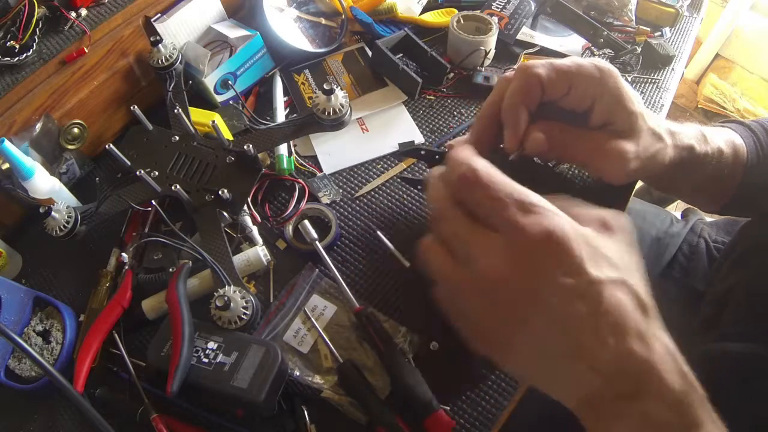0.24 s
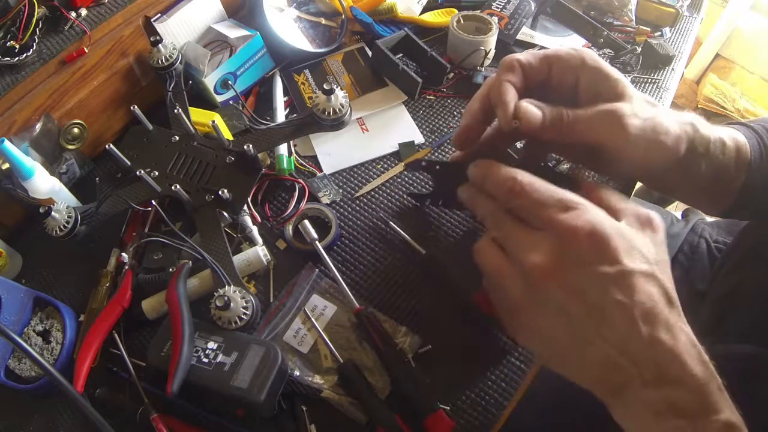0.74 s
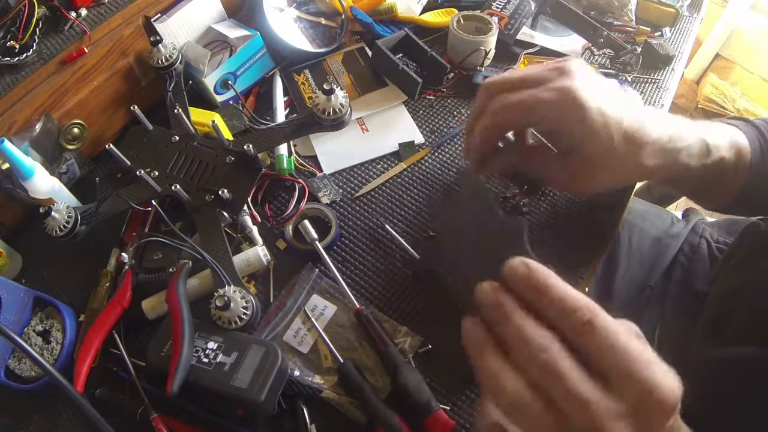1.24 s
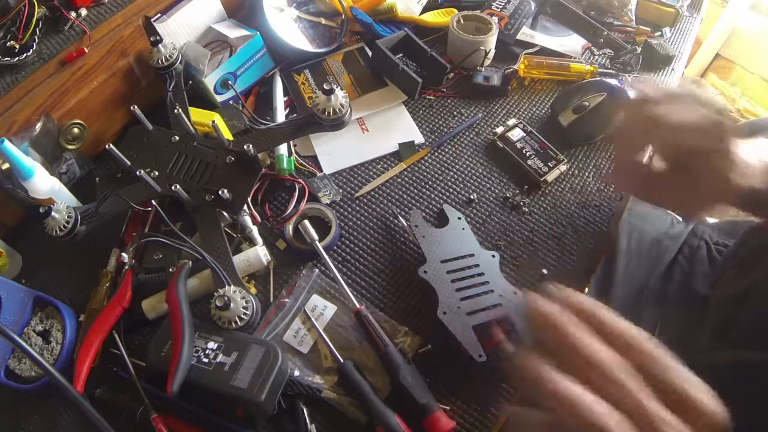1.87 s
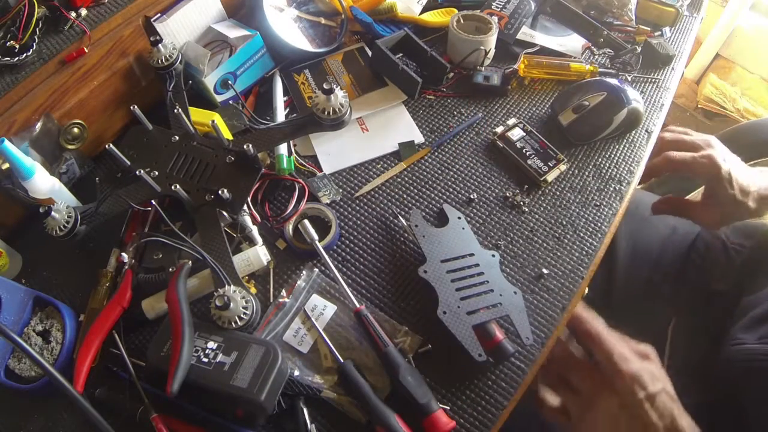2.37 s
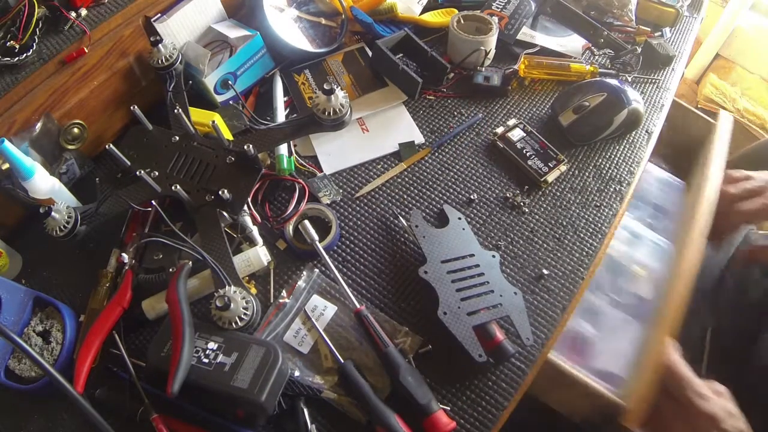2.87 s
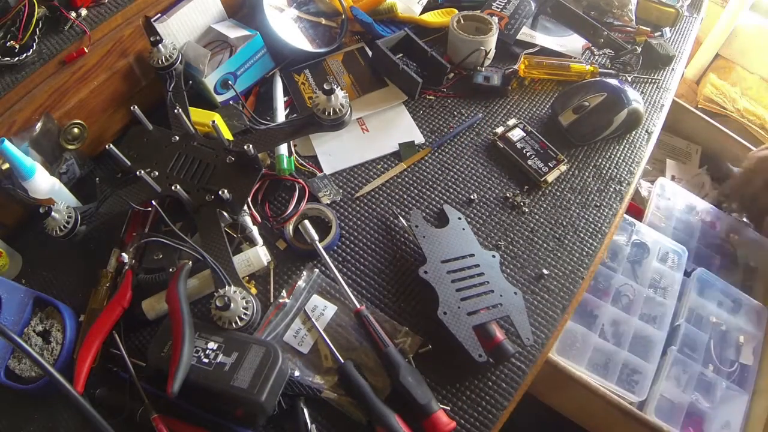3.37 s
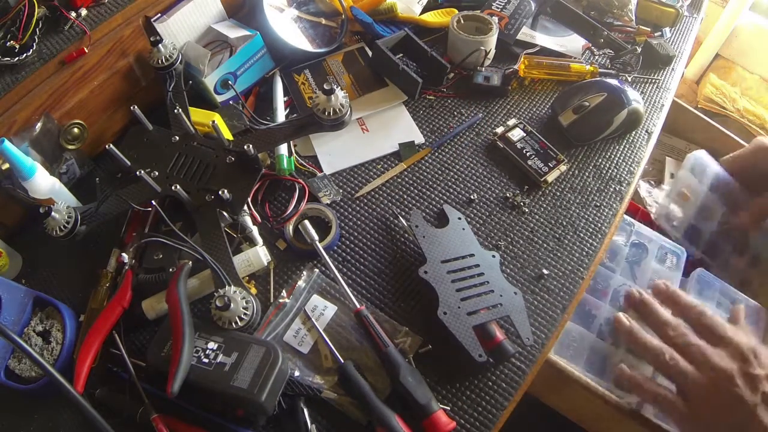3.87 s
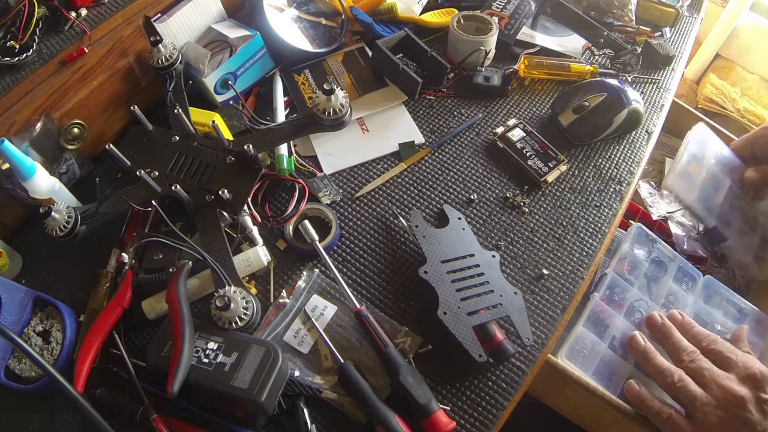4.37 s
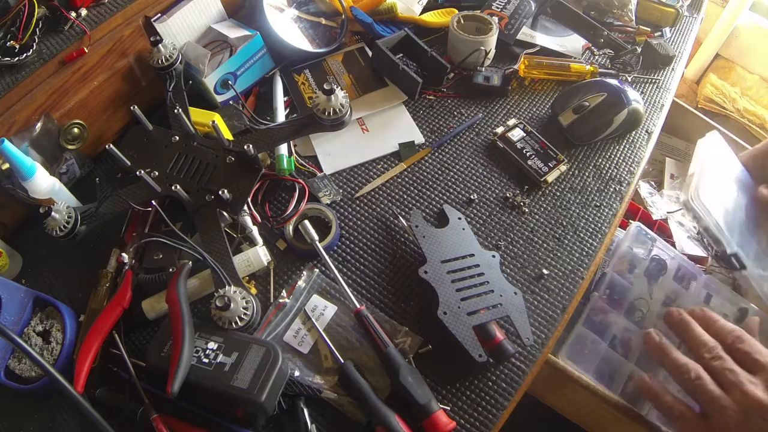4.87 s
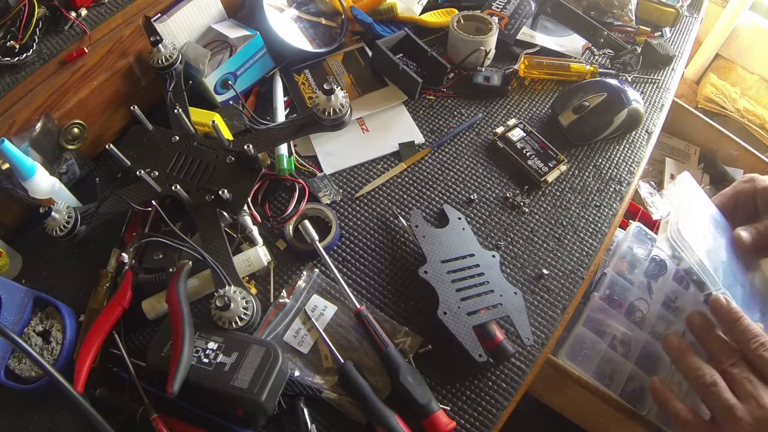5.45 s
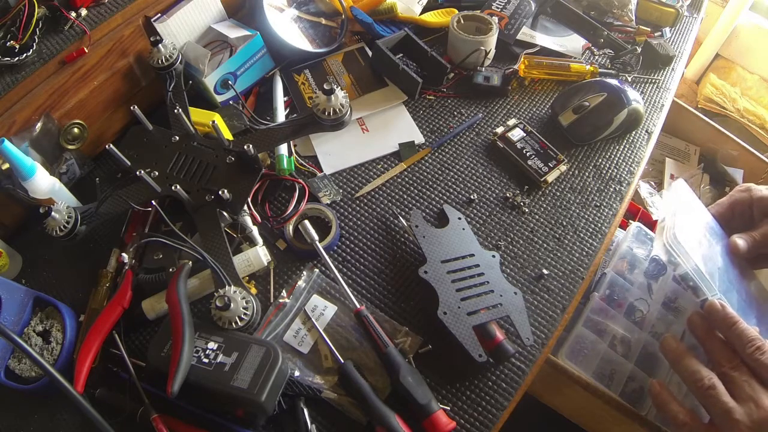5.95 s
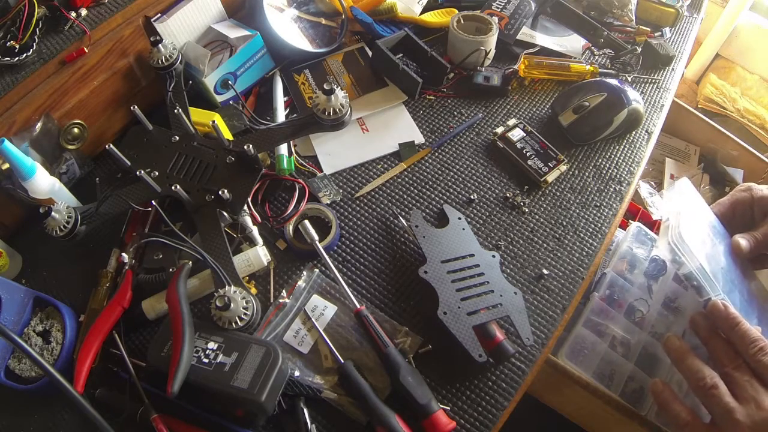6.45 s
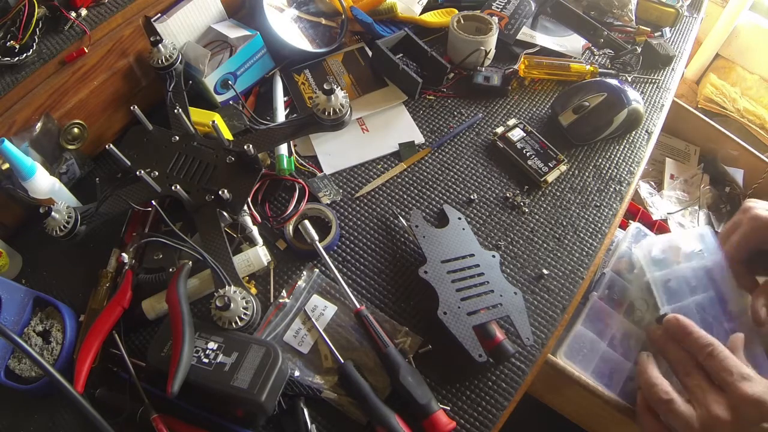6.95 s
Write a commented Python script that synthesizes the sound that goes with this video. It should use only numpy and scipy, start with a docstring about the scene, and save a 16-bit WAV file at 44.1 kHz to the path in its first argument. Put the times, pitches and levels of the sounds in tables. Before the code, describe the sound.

Over a low room rumble and a barely audible fluttering high whine, a thin plate is handled and set down sharply on a bench. A drawer grinds open with hollow wooden thumps and a ringing runner. Screw-filled plastic boxes are shifted with knocks and bright rattles, gently searched after a lull, and finally dropped with a hard clack. Close microphone, short indoor echo.

```python
"""In a workshop with a low rumble, a thin plate is tapped down on a bench, a wooden drawer slides open
in jerks, and plastic boxes full of screws are lifted, tipped and put back. A faint whine pulses throughout.
Plate and boxes ring as fading sine waves, while scraping, rattling and room air are noise shaped in pitch
and loudness. Random reflections add the room."""
import sys
import numpy as np
from scipy import signal
from scipy.fft import rfft, irfft
from scipy.io import wavfile
from scipy.ndimage import uniform_filter1d

SR = 44100
rng = np.random.default_rng(int(sys.argv[2]) if len(sys.argv) > 2 else 0)


def store_wav(level_fs):
    """Save 16-bit WAV to argv[1]."""
    pcm = np.round(np.clip(np.atleast_2d(level_fs), -1, 1) * 32767)
    wavfile.write(sys.argv[1], SR, pcm.T.astype(np.int16))


N = 317520

# Bright spectrum of small hard metal parts: pitch_hz [Hz], level_db [relative dB per Hz]
METAL_SPECTRUM = [(530, -28), (900, -18.5), (1190, -7.5), (2010, -9.5), (3050, -2), (4740, -1), (5360, 2),
                  (6750, -2), (7870, -9.5), (11200, -15.5), (12500, -34), (16200, -69), (22000, -120)]
# Dull spectrum of the plastic box walls: pitch_hz [Hz], level_db [relative dB per Hz]
WALL_SPECTRUM = [(88, -51), (150, -9), (183, 1), (237, -9), (385, 1.5), (516, -5), (780, -2.5),
                 (2500, -7.5), (3250, -38.5), (5500, -120)]


def amp(db):
    """Turns decibels into a plain factor."""
    return 10 ** (np.asarray(db) / 20)


def evened(x):
    """Scales a sound to an average (rms) level of 1."""
    return x / np.sqrt(np.mean(x ** 2) + 1e-20)


def add(mix, s, sound):
    """Adds a sound into the mix from second s on, cut at the end of the mix."""
    part = mix[round(s * SR):][:len(sound)]
    part += sound[:len(part)]


def coloured(x, points):
    """Shapes x by a spectrum and evens it to rms 1."""
    hz, db = np.transpose(points)
    f = np.fft.rfftfreq(len(x), 1 / SR)
    curve_db = np.interp(np.log(f + 1), np.log(hz + 1), db)
    return evened(irfft(rfft(x) * amp(curve_db), len(x)))


def tilted(x, tilt_db):
    """Leans the spectrum about 4 kHz by so many dB per octave, flat below 1 kHz."""
    hz = np.fft.rfftfreq(len(x), 1 / SR)
    octaves = np.log2(np.clip(hz, 1000, None) / 4000)
    return irfft(rfft(x) * amp(tilt_db * octaves), len(x))


def whistles(x, modes):
    """Sum of narrow resonances fed by x, each given as (pitch Hz, width Hz, level dB)."""
    return sum(amp(db) * evened(signal.lfilter(*signal.iirpeak(hz, hz / width, SR), x))
               for hz, width, db in modes)


def stroke(t, start, length, rise, sag_db, t60):
    """Gain of one movement: swell, sagging hold, then a release of 60 dB in t60 seconds."""
    u = t - start
    swell = np.clip(u / max(rise, .001), 0, 1) ** 2
    sag = sag_db * np.clip((u - rise) / length, 0, 1)
    release = 60 * np.maximum(u - length, 0) / t60
    return swell * amp(sag - release)


def grains(count, spread_db, low_hz, high_hz, cycles):
    """Random collisions of uneven size, each a few dying cycles at one of 24 pitches."""
    collisions_per_s = 2500
    size = amp(spread_db * np.minimum(rng.exponential(1, count), 4))
    size = size * (rng.random(count) < collisions_per_s / SR)
    which, out = rng.integers(0, 24, count), np.zeros(count)
    for k, hz in enumerate(np.geomspace(low_hz, high_hz, num=24)):
        turns = np.arange(400) * hz / SR
        grain = np.sqrt(hz) * np.sin(2 * np.pi * turns) * np.exp(-turns / cycles)
        out += signal.oaconvolve(size * (which == k), grain)[:count]
    return out


def room_air():
    """Steady noise whose two lowest bands swell on their own, with faint fan whistles."""
    # Spectrum of the air: pitch_hz [Hz], level_db [relative dB per Hz]
    air_spectrum = [(7.1, -35), (12, 7.5), (32, 5.5), (54, -15.5), (97, -11), (113, -15.5), (138, -28.5),
                    (174, -24.5), (371, -36), (1120, -42), (4930, -52.5), (5700, -51), (6590, -57),
                    (11100, -63), (12500, -83.5), (16200, -113), (22000, -120)]
    # Swell of the rumble: time_s [s], throb_db [dB], drone_db [dB]
    rumble_swell = [(0.0, -28.5, -45), (0.26, -48.5, -44), (0.62, -40.5, -44.5), (2.17, -40.5, -45),
                    (3.31, -38, -38.5), (3.35, -41, -47), (3.43, -35.5, -44), (4.33, -42, -42.5),
                    (4.47, -38, -47), (5.29, -38.5, -42), (5.39, -43, -41.5), (6.62, -39.5, -42),
                    (6.76, -57, -45.5), (6.86, -38.5, -45.5), (7.0, -47, -48), (7.02, -35.5, -38),
                    (7.14, -34, -44), (7.2, -38, -48)]
    # Near-tone in the deepest rumble: pitch_hz [Hz], width_hz [Hz], level_db [relative dB]
    throb_tone = [(27.63, 2.56, -3)]
    # Fan whistles: pitch_hz [Hz], width_hz [Hz], level_db [dB]
    fan_whistles = [(716, 13, -77), (1057, 17, -76.5)]
    air_db, waver_db = -37.5, 1
    air = amp(air_db) * coloured(rng.standard_normal(N), air_spectrum)
    deep = signal.sosfiltfilt(signal.butter(3, 50, fs=SR, output="sos"), air)
    low = signal.sosfiltfilt(signal.butter(3, 140, fs=SR, output="sos"), air)
    s, throb_db, drone_db = np.transpose(rumble_swell)
    t = np.arange(N) / SR
    # the drone also wavers at random
    waver = amp(waver_db * evened(uniform_filter1d(rng.standard_normal(N), size=6000)))
    throb = evened(0.91 * evened(deep) + whistles(rng.standard_normal(N), throb_tone))
    throb = throb * amp(np.interp(t, s, throb_db))
    drone = evened(low - deep) * amp(np.interp(t, s, drone_db)) * waver
    # the swelling bands replace the steady lows
    return air - low + throb + drone + whistles(rng.standard_normal(N), fan_whistles)


def whine():
    """Fuzzy high tones, made of narrow noise, that switch on and off about 30 times a second."""
    # Tones before the switching: pitch_hz [Hz], width_hz [Hz], level_db [dB]
    whine_tones = [(5740, 83, -76), (11290, 51, -87.5)]
    pulses_per_s, pulse_middle_s = 29.975, .0234
    turn = np.cos(2 * np.pi * pulses_per_s * (np.arange(N) / SR - pulse_middle_s))
    gate = np.clip(2.5 * (turn - .1), 0, 1)
    return whistles(rng.standard_normal(N), whine_tones) * gate


def plate():
    """Each tap is a thin crack and the plate's modes; the spot struck favours or softens some of them."""
    # Taps: start_s [s], peak_db [dB], tilt_db [dB per octave], spot_hz [Hz, pitch affected by the spot],
    # lift_db [dB, its lift], ring [factor on t60], rub_s [s]
    taps = [(.019, -40, -5, 4850, 8, 0.27, 0.0027), (0.0801, -27.5, -6, 4870, 33, 0.34, 0),
            (.1098, -26.5, -5.5, 4870, 49, 0.25, 0.0013), (.44, -58.5, 8, 8060, 8, 2.2, 0.04),
            (.68, -60.5, 4, 8000, 10, 1.1, 0.041), (0.732, -51.5, 4, 9100, 14, 0.56, 0),
            (0.86, -49.5, -2, 6578, 15, 0.92, 0.0039), (1.4780, -10, 5.5, 5250, -1.5, 0.54, 0),
            (1.4885, -22.5, 4, 3860, -4, 0.5, 0.00051), (1.6724, -27, 3, 8050, 6, 1.13, 0.0016),
            (1.7208, -45, 1, 3250, 29, 0.58, 0.0043), (2.1426, -45.5, 1.5, 2670, 38, 3.3, 0.0057)]
    # Modes of the plate: pitch_hz [Hz], level_db [relative dB], t60_s [s to fade by 60 dB]
    plate_modes = [(806, -10.5, 0.12), (1640, -74.5, 0.021), (2135, -7.5, 0.15), (2240, -7.5, 0.087),
                   (2670, -23.5, 0.055), (3250, -8, 0.1036), (3776, -5.5, 0.093), (3860, -10, 0.16),
                   (3980, -0.5, 0.058), (4600, -11, 0.072), (4870, -16.5, 0.0882), (5300, -21.5, 0.076),
                   (5254, 6.5, 0.038), (5800, -7.5, 0.056), (6190, -27, 0.087), (6578, -12, 0.12),
                   (7580, -10.5, 0.08), (8130, -4, 0.022), (8310, -15, 0.0816), (9100, -11.5, 0.074),
                   (9520, -9.5, 0.11), (11075, -8.5, 0.046), (12080, -22.5, 0.042)]
    out, t = np.zeros(N), np.arange(9000) / SR
    hz, db, t60 = np.transpose(plate_modes)[:, :, None]
    for s, peak_db, tilt_db, spot_hz, lift_db, ring, rub in taps:
        lift = lift_db * np.exp(-(np.log2(hz / spot_hz) / 0.056) ** 2)
        spot_db = lift + tilt_db * np.log2(hz / 4000)
        # the loose plate chatters on the bench, so each mode wavers
        wobble = uniform_filter1d(rng.standard_normal((len(hz), len(t))), size=100)
        waver = 1 + .45 * evened(wobble)
        modes = amp(db + spot_db - 60 * t / (t60 * ring)) * np.sin(2 * np.pi * hz * t) * waver
        # neighbours start in opposite directions: no low thud
        tone = modes[::2].sum(0) - modes[1::2].sum(0)
        crack = 0.19 * coloured(rng.standard_normal(len(t)), METAL_SPECTRUM) * amp(-60 * t / 0.0098)
        # a rub is many tiny taps in a row; without one, a single tap
        contact = rng.standard_normal(len(t)) * (t <= rub)
        sound = signal.fftconvolve(tone / abs(tone).max() + crack, contact)
        add(out, s, amp(peak_db) * sound / abs(sound).max())
    return out


def rattles():
    """Bright rattle with the plate taps, then screws colliding and sliding in the boxes, over duller grains."""
    # Bursts of rattle: start_s [s], swell_s [s], length_s [s], rattle_db [dB gain],
    # walls_db [dB gain, dull grains as of plastic walls], hollow_hz [Hz, pitch that stands out]
    bursts = [(.052, .01, 0.024, -59, -77, 6000), (0.076, .003, 0.015, -53, -75, 3000),
              (0.108, .004, 0.0076, -43, -72, 4600), (1.474, 0.0018, 0.027, -46, -72, 9300),
              (1.525, 0.033, 0.13, -59.5, -81, 5630), (1.673, .002, 0.027, -53, -72, 3300),
              (3.392, .1, 0.2, -51.5, -53, 2730), (3.552, 0.012, 0.66, -47.5, -47.5, 2500),
              (3.886, 0.015, 0.04, -40, -51, 3200), (3.934, 0.021, 0.12, -45.5, -49.5, 5000),
              (4.025, 0.014, 0.028, -39, -67, 3350), (4.101, 0.01, 0.019, -41.5, -72, 3000),
              (4.162, 0.044, 0.061, -48, -72, 3400), (4.972, 0.016, 0.043, -63.5, -83, 5300),
              (5.073, .01, 0.079, -64, -75, 4700), (5.125, 0.063, 0.2, -52, -71, 3400),
              (5.304, .06, 0.16, -54, -79, 3620), (5.413, 0.018, 0.064, -51.5, -56.5, 3540),
              (5.67, .01, 0.034, -48.5, -55.5, 2250), (5.71, 0.049, 0.14, -58.5, -64, 2500),
              (5.85, 0.035, 0.04, -47.5, -57, 2450), (5.94, 0.036, 0.051, -59, -63, 2680),
              (6.709, 0.018, 0.097, -42.5, -48.5, 5800), (6.84, 0.018, 0.11, -60, -55.5, 3070),
              (6.942, 0.063, 0.09, -39, -45.5, 3000), (7.002, 0.0052, 0.028, -23.5, -23.5, 5300),
              (7.036, 0.039, 0.056, -31, -42, 5700)]
    sliding = 0.42  # share of the power that is smooth noise
    base_tilt_db, tilt_per_db = -0.5, -0.0824  # dB per octave at -50 dB; louder bursts are duller
    sag_db, burst_t60_s = -6, 0.14
    hollow_q, hollow_db = 5.4, -10  # sharpness, level
    out = np.zeros(N)
    hits = coloured(grains(N, 4.5, 1200, 11500, 1.5), METAL_SPECTRUM)
    slide = coloured(rng.standard_normal(N), METAL_SPECTRUM)
    metal = np.sqrt(1 - sliding) * hits + np.sqrt(sliding) * slide
    wall_size = amp(3.0 * np.minimum(rng.exponential(1, N), 3))
    walls = coloured(rng.standard_normal(N) * wall_size, WALL_SPECTRUM)
    for s, swell, length, rattle_db, walls_db, hollow_hz in bursts:
        at = np.arange(round(s * SR), min(round((s + length + burst_t60_s) * SR), N))
        rattle = tilted(metal[at], base_tilt_db + tilt_per_db * (rattle_db + 50))
        rattle = rattle + whistles(rattle, [(hollow_hz, hollow_hz / hollow_q, hollow_db)])
        gain = stroke(at / SR, s, length, swell, sag_db, burst_t60_s)
        add(out, s, gain * (amp(rattle_db) * rattle + amp(walls_db) * walls[at]))
    return out


def knocks():
    """Hollow knocks with the plate taps, then of drawer and boxes: low modes at each pitch, and a shudder."""
    # Blows: start_s [s], level_db [dB gain], pitch_hz [Hz], t60_s [s, before the mode's factor],
    # hardness_db [dB more for each higher mode]
    blows = [(0.107, -28, 222, 0.048, -10), (1.72, -40, 223, 0.079, -10), (2.144, -34.5, 302, 0.049, -4),
             (2.345, -40.5, 490, 0.024, -7), (2.399, -19, 442, 0.021, -14), (2.577, -24.5, 393, 0.024, 8.5),
             (2.669, -32, 224, 0.14, 3.5), (2.858, -23, 242, 0.028, 9.5), (3.565, -28.5, 436, 0.059, 6.5),
             (3.754, -41, 406, 0.039, 0), (3.804, -41, 420, 0.066, 12), (3.862, -23.5, 477, 0.016, 9.5),
             (3.893, -9, 523, 0.027, -11), (3.979, -31, 563, 0.025, 11), (4.011, -25.5, 630, 0.047, -6.5),
             (4.037, -13, 360, 0.021, 12), (4.072, -33, 646, 0.034, 4), (4.109, -26.5, 329, 0.048, 10),
             (5.14, -44, 209, 0.034, 12), (5.77, -44, 970, 0.015, 0), (6.711, -20.5, 365, 0.038, 10),
             (6.749, -20.5, 330, 0.06, 5), (6.832, -34, 213, 0.028, -6), (6.895, -37, 326, 0.053, 11),
             (7.007, -17, 376, 0.025, 13)]
    # Modes of a hollow box: multiple [of the pitch], level_db [relative dB], ring [factor on t60]
    box_modes = [(1, 0.5, 0.75), (2.2, -13.5, 0.8), (3.7, -23.5, 0.41), (4.6, -35, 0.23)]
    # the shudder changes less than the blow: dB at a 0 dB blow, dB per dB
    shudder_base_db, shudder_growth = -26, 0.63
    out, t = np.zeros(N), np.arange(9000) / SR
    for s, level_db, hz, t60, hard_db in blows:
        modes = np.zeros(len(t))
        for i, (multiple, db, ring) in enumerate(box_modes):
            fade = amp(level_db + db + i * hard_db - 60 * t / (t60 * ring))
            modes += fade * np.sin(2 * np.pi * multiple * hz * t)
        shudder_db = shudder_base_db + shudder_growth * level_db
        shudder = coloured(rng.standard_normal(len(t)), WALL_SPECTRUM) * amp(shudder_db - 60 * t / 0.089)
        add(out, s, (modes + shudder) * np.minimum(t / 0.0016, 1))
    return out


def drawer():
    """Dense uneven slips scrape the runner, ring it, make it groan and shake the wooden case."""
    # Jerks: start_s [s], length_s [s], then gains [dB]: scrape_db, boom_db (wood), ring_db (runner), groan_db
    jerks = [(2.309, 0.1, -61.5, -56.5, -77, -73), (2.389, 0.042, -41, -42.5, -45, -60),
             (2.467, 0.064, -58.5, -55, -56, -64), (2.566, 0.069, -52.5, -41.5, -45, -52),
             (2.664, 0.043, -53, -41, -62, -59), (2.706, 0.11, -44.5, -46, -40, -63),
             (2.845, 0.04, -44.5, -43.5, -38, -60), (2.901, 0.089, -53, -50, -63, -51),
             (3.002, 0.16, -42, -41, -38, -51), (3.17, .16, -41, -41.5, -37.5, -66)]
    # Power on the jerk's shape for scrape, boom, ring, groan [no unit]: the ring drops faster
    fall_off = [1, 1, 1.7, 1]
    # Spectra of scrape and wooden boom: pitch_hz [Hz], level_db [relative dB per Hz]
    scrape_spectrum = [(400, -15), (700, -3.5), (1070, -11), (1500, -1), (2900, -6), (5700, -8),
                       (8000, -14), (11400, -26.5), (12500, -56)]
    boom_spectrum = [(53, -35), (90, -20), (134, -2.5), (292, -7), (532, -11.5), (690, -18.5), (1070, -18),
                     (1500, -29), (1950, -26), (3300, -120)]
    # Resonances of runner and wooden case: pitch_hz [Hz], width_hz [Hz], level_db [relative dB]
    runner_modes = [(2480, 92, -7), (5450, 560, -16.5), (3570, 99, -39)]
    case_modes = [(142.6, 8.9, -6.5), (264, 27, -12.5), (744, 130, -13.5)]
    rise_s, sag_db, jerk_t60_s = 0.013, -3.5, 0.24  # times and sag before the power
    groan_start_hz, groan_hz_per_s, groan_top_hz = 598, 1550, 1480
    s, n = jerks[0][0], round(1.3 * SR)
    t = s + np.arange(n) / SR
    gains = np.zeros((4, n))
    for start, length, *db in jerks:
        shape = stroke(t, start, length, rise_s, sag_db, jerk_t60_s)
        gains += amp(db)[:, None] * shape ** np.c_[fall_off]
    scrape_gain, boom_gain, ring_gain, groan_gain = gains
    # rollers pass rough spots
    bumps = amp(1.55 * evened(uniform_filter1d(rng.standard_normal(n), size=300)))
    slips = rng.standard_normal(n) * amp(3.5 * np.minimum(rng.exponential(1, n), 4)) * bumps
    scrape = coloured(slips, scrape_spectrum)
    ring = whistles(slips, runner_modes)
    # the slips run backwards here, so boom and scrape do not move in step
    boom = coloured(slips[::-1], boom_spectrum) + whistles(slips[::-1], case_modes)
    # slow noise on a climbing tone: the resonance of the free length of the runner
    groan_hz = np.minimum(groan_start_hz + groan_hz_per_s * (t - s), groan_top_hz)
    groan = evened(uniform_filter1d(slips, size=150)) * np.sin(2 * np.pi * np.cumsum(groan_hz) / SR)
    out = np.zeros(N)
    add(out, s, scrape_gain * scrape + ring_gain * ring + boom_gain * boom + groan_gain * groan)
    return out


def clicks():
    """The drawer runner, screws and lids click: a wide crack, a short fuzzy ring, then a spill that settles."""
    # Clicks: start_s [s], level_db [dB gain], ring_hz [Hz], spill_db [dB, fading rattle within the click]
    sharp_clicks = [(2.3486, -38.5, 4470, -20), (2.4074, -24, 2240, -26), (2.475, -41, 2500, -4.5),
                    (2.5824, -28.5, 2360, -14.5), (2.72, -31, 2200, -7.5), (2.861, -22.5, 2380, -13.5),
                    (3.0062, -37, 2360, -23), (3.056, -26, 2480, -15.5), (3.1837, -44, 2470, -20),
                    (3.266, -23, 3550, -13), (3.293, -27, 4500, -14), (3.467, -38, 2770, -10.5),
                    (3.5628, -29, 5740, -19), (3.6492, -33.5, 6240, -11), (3.7, -32, 7800, -21),
                    (3.733, -37, 2720, -11), (3.7557, -30, 2290, -14), (3.8065, -23, 2930, -20),
                    (3.8449, -25, 5900, -14.5), (3.909, -24.5, 3430, -14), (3.9783, -28, 5000, -25),
                    (4.038, -29.5, 2240, -17), (4.047, -22, 3470, -32), (4.11, -46, 5150, -19),
                    (4.2025, -38, 3510, -18), (4.325, -54, 4500, -13), (4.565, -60, 2250, -4.5),
                    (4.7162, -41, 2500, -12.5), (4.977, -42, 5300, -26), (5.064, -46, 4630, -20),
                    (5.084, -34, 4730, -15.5), (5.151, -31, 5770, -14), (5.1677, -30, 6000, -31),
                    (5.1871, -31, 4380, -18), (5.212, -35, 4290, -25), (5.2222, -30, 5300, -18),
                    (5.24, -36.5, 5800, -4), (5.2743, -35.5, 3180, -7.5), (5.3798, -38, 5740, -8.5),
                    (5.4281, -28, 5870, -21), (5.435, -37, 3650, -15), (5.465, -29.5, 3420, -13.5),
                    (5.476, -36, 5300, -21), (5.588, -44, 5630, -18), (5.685, -32, 6600, -24),
                    (5.725, -32.5, 6250, -18), (5.781, -47.5, 4880, 0.5), (5.795, -37.5, 5800, -10),
                    (5.817, -36, 2330, -33), (5.847, -32, 5240, -9.5), (5.8759, -32, 5290, -5.5),
                    (5.889, -39, 5200, -17), (5.9479, -43.5, 2880, -9), (5.9723, -41.5, 6100, -8),
                    (5.99, -38.5, 5400, -17), (6.5895, -54, 2200, -6), (6.7129, -30.5, 2670, -12.5),
                    (6.7292, -23, 5560, -14), (6.7533, -31.5, 6950, -11), (6.8787, -32, 3190, -13.5),
                    (7.0079, -16, 5800, -4), (7.011, -2.5, 5450, -8.5), (7.024, -10, 4770, -33),
                    (7.0647, -23, 5760, -5.5), (7.087, -19.5, 5300, -6.5)]
    ring_cycles, spill_t60_s = 65, 0.092  # cycles and seconds to fade by 60 dB
    out, t = np.zeros(N), np.arange(9000) / SR
    for s, level_db, hz, spill_db in sharp_clicks:
        noise = rng.standard_normal((2, len(t)))
        fuzz = evened(signal.lfilter(*signal.iirpeak(hz, 5.4, SR), noise[0]))
        ring = (fuzz + 1.2 * np.sin(2 * np.pi * hz * t)) * amp(-60 * t * hz / ring_cycles)
        crack = coloured(noise[0], METAL_SPECTRUM) * amp(-60 * t / 0.0047)
        uneven = noise[1] * amp(4.0 * np.minimum(rng.exponential(1, len(t)), 4))
        spill = coloured(uneven, METAL_SPECTRUM) * amp(spill_db - 60 * t / spill_t60_s)
        click = 0.4 * ring + 0.32 * crack + spill
        add(out, s, amp(level_db) * click * np.minimum(t / 0.00037, 1))
    return out


def workshop(x):
    """The room's echo: sparse reflections of random sign, whose treble dies sooner."""
    reflections = np.zeros(SR // 2)
    at = np.arange(200, len(reflections) - 20, 20)
    reflections[at + rng.integers(0, 20, len(at))] = rng.choice([-1., 1.], len(at))
    hz, t, z = signal.stft(reflections, SR, nperseg=256)
    t60 = np.interp(hz, [0, 3000, 12000], [.35, .3, .22])[:, None]
    tail = signal.istft(z * amp(-60 * t / t60), SR, nperseg=256)[1]
    return signal.fftconvolve(x, tail / np.linalg.norm(tail))[:N]


def scene():
    """Adds the nearby sounds, their echo in the room, the room air and the whine."""
    near = plate() + rattles() + knocks() + drawer() + clicks()
    return (near + amp(-13.5) * workshop(near) + room_air() + whine())[None]


def record(dry):
    """Soft overload rounds the loudest peaks, then a filter removes the highest treble."""
    headroom, edge_hz = .9, 12050
    held = headroom * np.tanh(dry / headroom)
    low_pass = signal.firwin(511, edge_hz, window=("kaiser", 9), fs=SR)
    return signal.oaconvolve(held, low_pass[None], "same")


dry = scene()
out = record(dry)
store_wav(out)
```